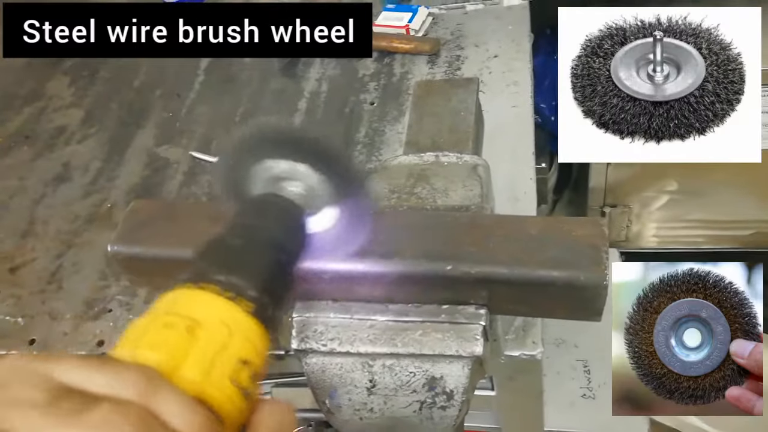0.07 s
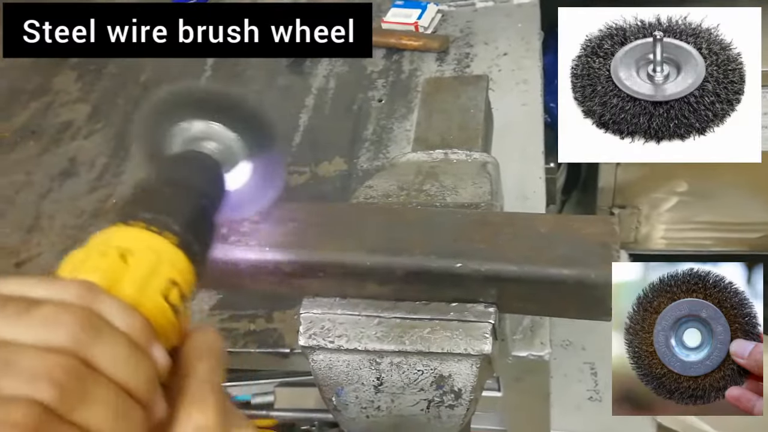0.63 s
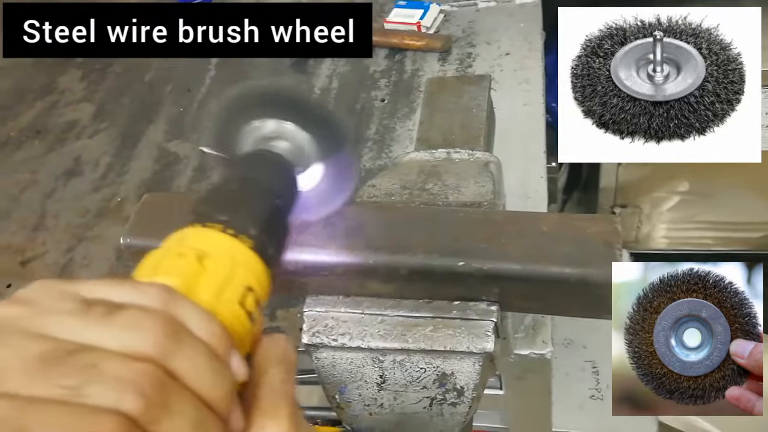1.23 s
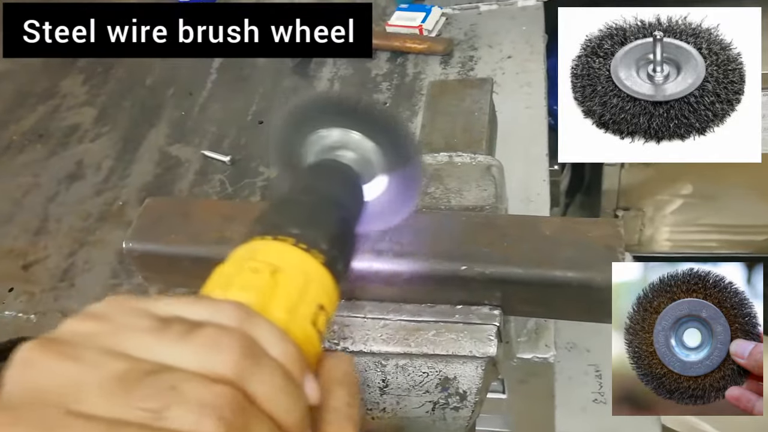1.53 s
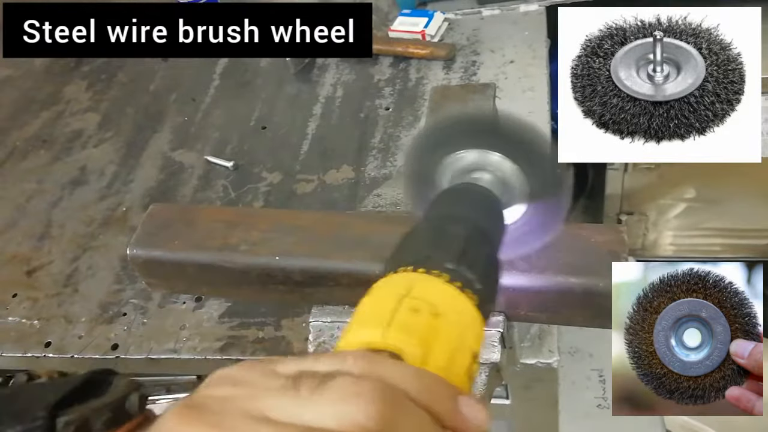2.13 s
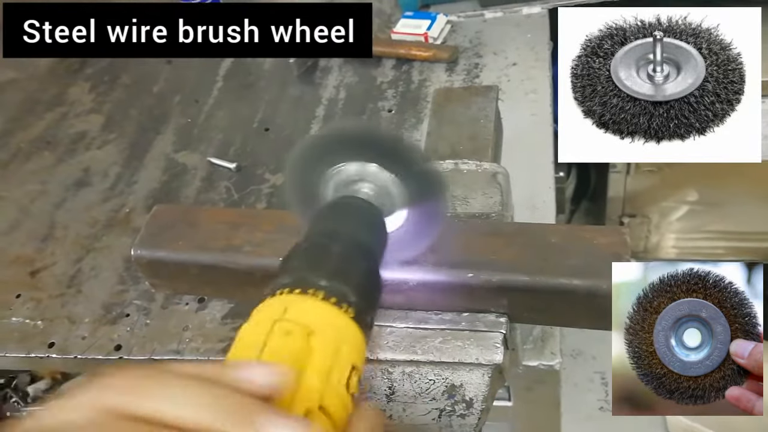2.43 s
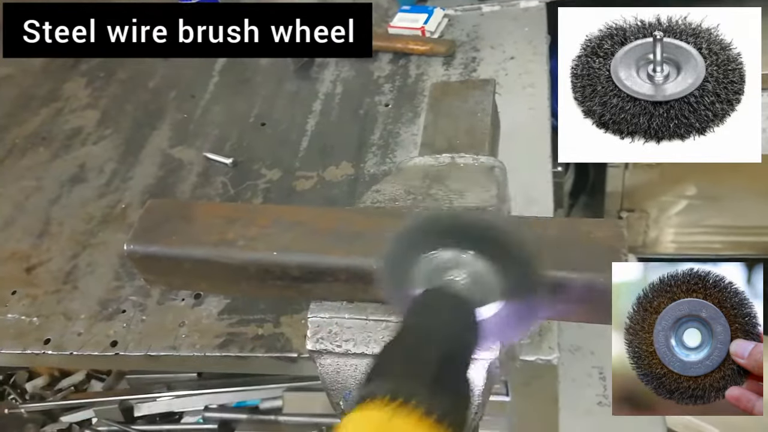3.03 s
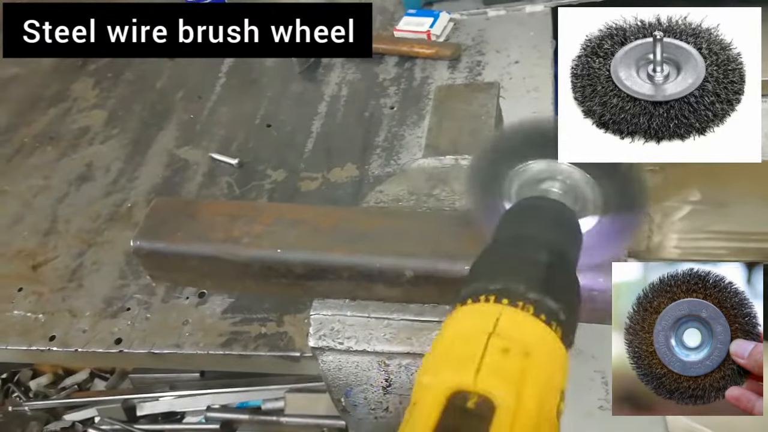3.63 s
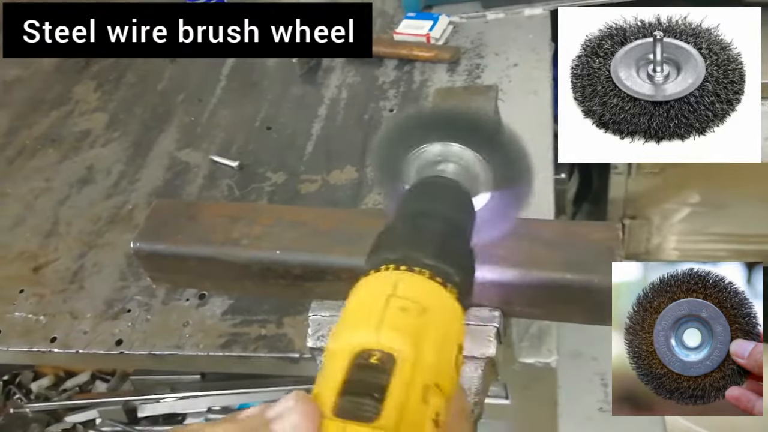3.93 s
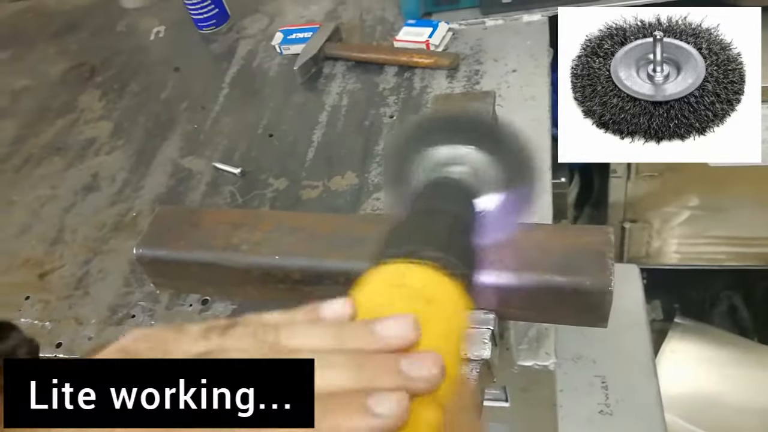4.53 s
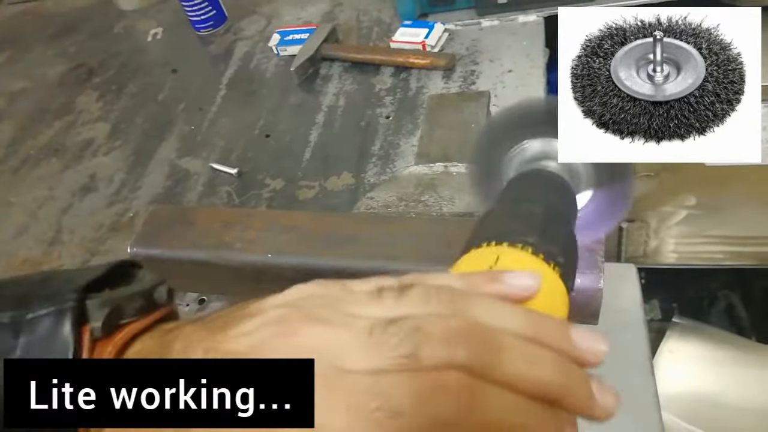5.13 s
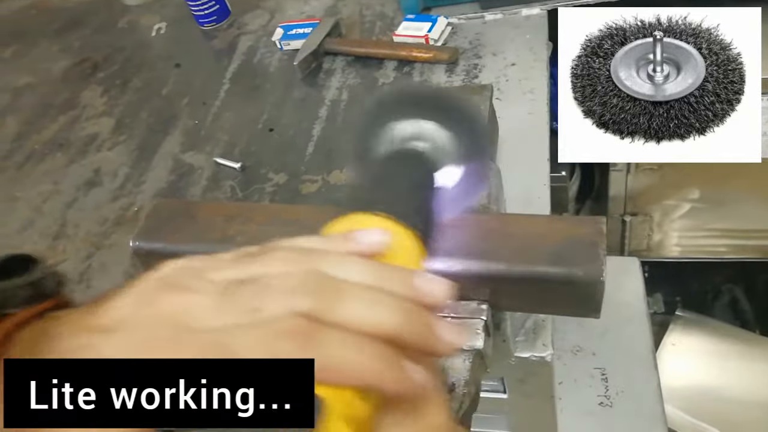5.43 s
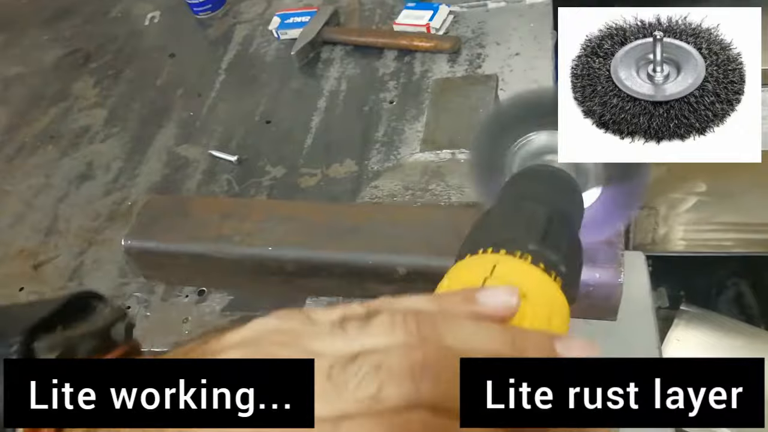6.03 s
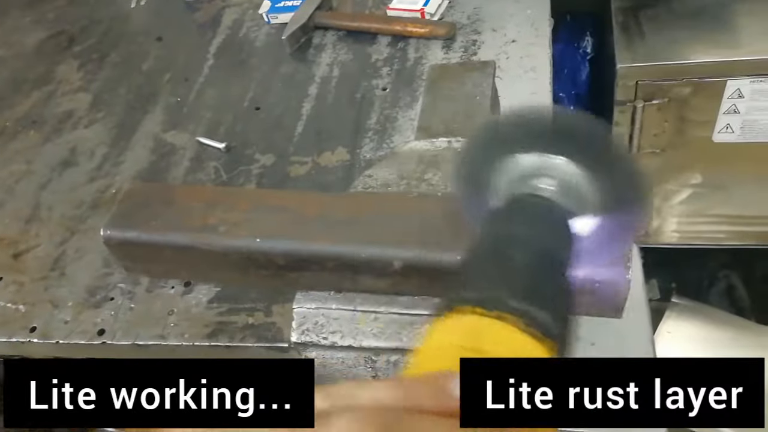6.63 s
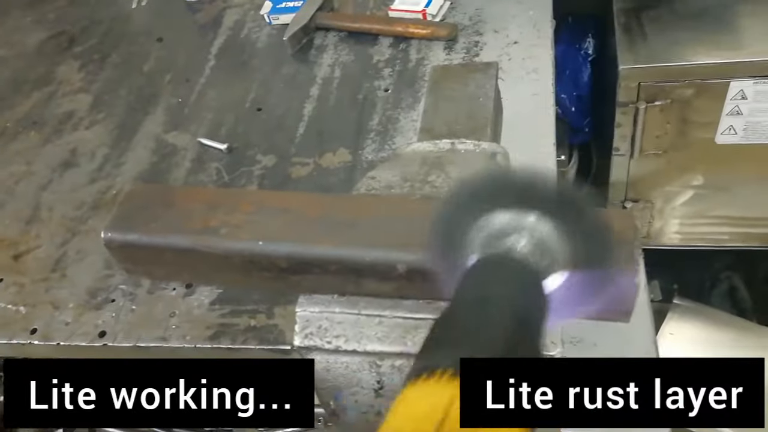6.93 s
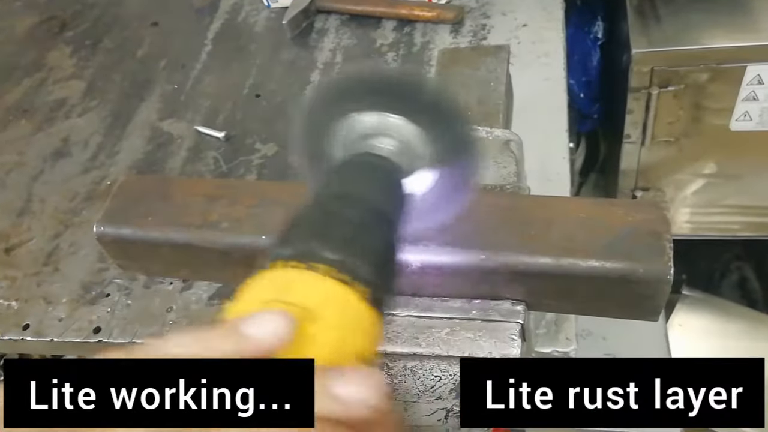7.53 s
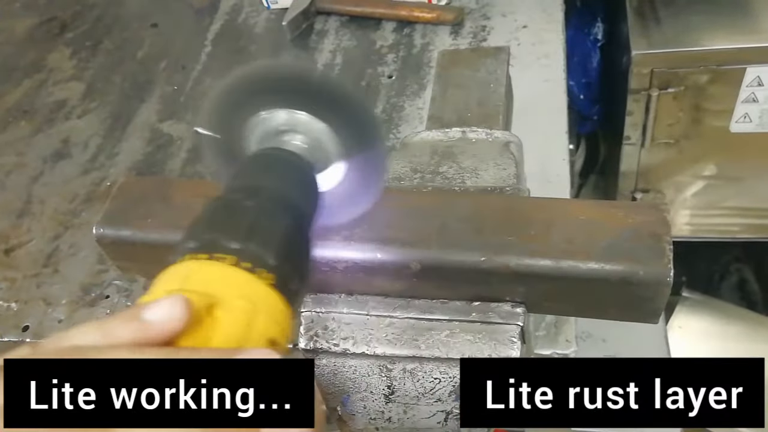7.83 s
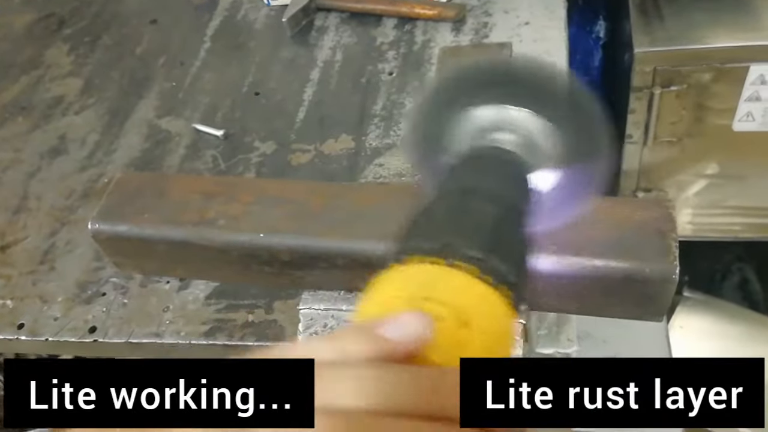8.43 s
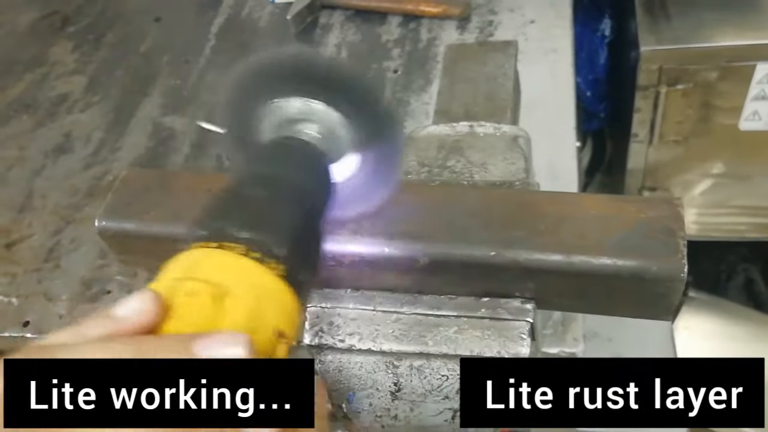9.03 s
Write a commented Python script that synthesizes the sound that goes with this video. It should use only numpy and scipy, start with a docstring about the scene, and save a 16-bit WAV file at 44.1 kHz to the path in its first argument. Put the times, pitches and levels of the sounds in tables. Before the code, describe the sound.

From the first moment, a wire wheel on a cordless drill scrubs a rusty steel bar with a dense, hissing rasp and a light metallic ring. The rasp grows a little stronger by about 2 seconds and keeps shifting in tone as the wheel moves back and forth. At around 2.2 to 2.5 seconds the wires catch the edge in one rough, falling screech. The drill's high whine runs throughout, swelling in short surges, most clearly between 2.5 and 5.3 seconds. Its pitch slowly sinks under the load, with small recoveries near 3 and 7 seconds. A thinner gear whistle comes up slightly around 7.5 to 8 seconds and again near 9. The scrubbing continues to the end, just past 9 seconds. The sound is close and in stereo, with a faint low workshop rumble and hum beneath.

```python
"""In a humming workshop, a cordless drill spins a wire wheel along a rusty steel bar held in a vice.
Thousands of bristle strikes a second make the bar and wheel ring with a rasp, and once the wires
screech over the edge. The motor and gears whine, sag under the load and pick up when the hand eases off.
Two close microphones hear the rasp change as the wheel travels back and forth."""
import sys
import numpy as np
from scipy import signal
from scipy.fft import rfft, irfft
from scipy.io import wavfile
from scipy.ndimage import uniform_filter1d

SR = 44100
rng = np.random.default_rng(int(sys.argv[2]) if len(sys.argv) > 2 else 0)


def waveform_to_disk(signal):
    """Save audio, clipped to [-1, 1], as 16-bit WAV at the path in sys.argv[1]."""
    frames = np.transpose(np.atleast_2d(signal))
    scaled = np.clip(frames, -1, 1) * 32767
    samples = np.round(scaled).astype(np.int16)
    wavfile.write(sys.argv[1], SR, samples)


N = 408807
T = np.arange(N) / SR
SIDES = np.array([[.5], [-.5]])  # splits a balance (left minus right) between the two microphones

# The room's rumble. Each row: frequency in Hz, relative level in dB.
ROOM_RUMBLE = [(12, -31), (20, -5.5), (38, 1), (76, -5), (109, -6.5), (188, -7), (238, -15), (297, -14),
               (450, -26), (580, -49), (990, -120)]
# The room's hum. Each row: pitch in Hz, level in dB.
ROOM_HUM = [(32.3, -56), (99.7, -64), (114, -63), (145, -64)]
# How fast the motor turns. Each row: time in seconds, turns per second.
SHAFT_SPEED = [(0, 335), (0.25, 332.3), (0.68, 327.2), (1.2, 322.3), (1.62, 322.2), (2.27, 313),
               (2.55, 315.6), (3.02, 309), (3.17, 319.2), (3.33, 321.2), (3.39, 317), (3.6, 317),
               (4.1, 309.8), (4.36, 310.4), (4.58, 307), (5.04, 303.3), (5.29, 302.4), (5.5, 294.7),
               (5.8, 295), (6.1, 297), (6.4, 294), (6.98, 292.3), (7.22, 301.6), (7.6, 297.6), (8.1, 293.8),
               (8.85, 284), (9.27, 281.5)]
# The whine swells as the drill moves. Each row: start and end in seconds, peak and balance in dB.
WHINE_SWELLS = [(-.15, 0.27, -48, -6), (.5, 1.02, -41, -7), (1.26, 1.7, -37.5, -13),
                (1.72, 2.08, -37.5, -10), (2.19, 2.397, -37, -9), (2.46, 2.632, -34, 1.5),
                (2.587, 2.767, -32, -8), (2.76, 2.95, -41, -7), (3.018, 3.33, -30.5, -9),
                (3.42, 3.64, -30.5, -1), (3.53, 3.85, -36.5, -14), (4.09, 4.521, -34, -2),
                (4.56, 4.97, -36.5, -3), (5.1, 5.32, -35.5, -1), (6.47, 7.02, -44, -10),
                (7.139, 7.326, -40, -8), (7.55, 8.3, -44, 2), (9.001, 9.399, -48, -3)]
# A thinner gear whistle stands out. Each row: start and end in seconds, peak and balance in dB.
WHISTLE_SWELLS = [(7.3, 8.151, -46, -7), (8.74, 9.14, -43, -7)]
# Other motor and gear tones. Each row: multiple of the shaft speed, base level in dB, balance in dB.
MOTOR_TONES = [(0.995, -65.5, -7), (2.003, -66.5, 0), (2.993, -57.5, -0.5), (5, -55, -16),
               (9.95, -54.5, -9), (13.92, -51.5, -8), (20.1, -61, -3), (30.06, -61.5, 7)]
# Where the drill's housing rings. Each row: frequency in Hz, width in Hz, boost in dB.
HOUSING_RINGS = [(668, 27, 7.5), (987, 47, 10.5), (8925, 390, 11)]
# The falling screech. Each row: time in seconds, pitch in Hz, level in dB.
SCREECH = [(2.15, 3500, -70), (2.25, 3200, -40), (2.34, 2670, -31.5), (2.41, 2374, -34), (2.5, 2210, -46),
           (2.62, 1930, -70)]
# The hand's strokes. Each row: time of the turn in seconds, reach (0 left, 1 right), pause in seconds.
HAND_STROKES = [(2.05, 0.79, .02), (2.8, 0.87, .05), (3.55, 0.96, 0.073), (4.27, 1, .1), (5.2, 0.98, .02),
                (6.05, 0.99, 0.016), (6.95, 0.91, 0.42), (8.33, 0.78, 0.022)]
# How hard the wheel scrubs. Each row: time in seconds, strength in dB.
SCRUB_STRENGTH = [(0.0, -34.5), (0.95, -35.5), (1.4, -32), (2.3, -30), (3.25, -30), (4.0, -31),
                  (5.7, -32.5), (7.6, -31), (9.27, -32.5)]
# The fine, high scratching. Each row: time in seconds, strength in dB.
HISS_STRENGTH = [(0, -54.5), (1.2, -52.5), (2.1, -50.5), (3.6, -50.5), (4.0, -47.5), (4.45, -46.5),
                 (4.8, -50.5), (5.2, -49), (7.4, -51), (7.8, -51), (8.35, -50.5), (9.27, -50)]
# Where the bar and wheel ring. Each row: frequency in Hz, width in Hz, boost in dB.
STEEL_RINGS = [(1282, 123, 2), (1720, 140, 1), (4300, 620, 2)]
# Ringing that swells while the bristles bite at one spot.
# Each row: start and end in seconds, first and last frequency in Hz, width in Hz, boost in dB.
BITE_RINGS = [(-2.5, 1.7, 1000, 910, 240, 7), (-.6, 0.78, 4500, 4280, 450, 3),
              (-.6, 0.6, 2950, 2850, 350, 1.5), (-0.7, 1.6, 5400, 5900, 800, 2),
              (0.8, 2.75, 1150, 1340, 260, 4), (1.0, 2.8, 3060, 3450, 260, 3.5),
              (1.1, 2.1, 4400, 4600, 450, 3), (2.5, 3.8, 1580, 1620, 280, 3),
              (2.5, 4.2, 2300, 2060, 350, 3.5), (3.9, 4.6, 4200, 4280, 385, 3.5),
              (4.5, 5.19, 2950, 2860, 234, 3), (5, 5.05, 2400, 2350, 220, 6.5),
              (4.5, 5.53, 4740, 4950, 800, 5), (4.85, 5.6, 4240, 4200, 360, 4),
              (5.5, 6.6, 4500, 4750, 850, 2.5), (5.5, 6.64, 4230, 4180, 450, 4.5),
              (6.4, 6.4, 5300, 5150, 470, 7), (6.5, 7.38, 4230, 4200, 510, 6),
              (7.05, 8.12, 2510, 2550, 410, 5), (7.15, 8.3, 4130, 4130, 417, 6.5),
              (7.5, 8.28, 1620, 1664, 180, 4), (8, 8.95, 2440, 2570, 380, 7),
              (8.0, 8.8, 4450, 4140, 600, 4.5), (8.5, 9.5, 1700, 1734, 177, 3),
              (8.5, 9.4, 5950, 5800, 930, 3)]
# The rasp's tone colour. Each row: frequency in Hz, the left microphone's gain in dB with the wheel
# at the bar's left end and at its right end, then the same two for the right microphone.
RASP_COLOUR = [(436, -24, -29, -28, -29.5), (732, -16, -26.5, -18.5, -17.5),
               (1001, -11.5, -14.5, -15, -9.5), (1234, -5.5, -6, -1.5, -1), (1740, -15, -12.5, 1.5, -1.5),
               (2020, -12.5, -13.5, -2, -1), (2750, -14.5, -9, -5.5, -1), (3220, -12, -7, -2.5, 1),
               (3870, -11.5, -12, -8.5, -1), (4060, -8, -12.5, -2.0, -4), (5200, -2, -13, -5, -1.5),
               (6220, -3.5, -9.5, -10.5, -6.5), (8300, -11.5, -16, -13.5, -16.5),
               (10730, -23, -26, -23, -26.5), (15000, -25, -27, -25.5, -25.5)]
# How alike the microphones sound. Each row: frequency in Hz, likeness and share of the delay (0 to 1).
MIC_LIKENESS = [(40, 1, 1), (402, 0, 1), (755, 0.53, 0.92), (1180, .9, 0.41), (1670, 0.79, 0.34),
                (2190, 0.47, 0.96), (6060, 0.51, 0.94), (6230, .15, .5), (6370, 0.94, 0.01),
                (9000, 0.57, .03), (14800, 1, 0.02)]


def undb(db):
    """Turn decibels into a gain."""
    return 10 ** (np.asarray(db) / 20)


def over_time(table, t):
    """Read a table's columns at the times t."""
    times, *columns = np.transpose(table)
    return [np.interp(t, times, column) for column in columns]


def over_frequency(table, hz):
    """Read a table's columns at the frequencies hz, on a log scale."""
    points, *columns = np.transpose(table)
    return [np.interp(np.log(hz + 1), np.log(points), column) for column in columns]


def bell(offset, width):
    """A resonance hump: 1 at the centre, one half at half the width away."""
    return .5 ** ((2 * offset / width) ** 2)


def wander(rate):
    """A random drift of about 1 either way, with `rate` new values a second."""
    knots = rng.standard_normal(N // 100)
    return np.interp(T * rate, np.arange(len(knots)), knots)


def ripple(shape, size):
    """A smooth random pattern over frequency and time, about 1 either way."""
    field = rng.standard_normal(shape)
    for axis in (0, 1, 0, 1):
        field = uniform_filter1d(field, size[axis], axis=axis)
    return field / field.std()


def tone(turns, db, balance_db, lead=0):
    """A pure tone at both microphones; the left is ahead by `lead` radians."""
    return np.sqrt(2) * undb(db + SIDES * balance_db) * np.sin(2 * np.pi * turns + SIDES * lead)


def workshop(rumble_db=-52.0, waver_db=2):
    """Low rumble and a wavering hum, the same at both microphones."""
    shape_db, = over_frequency(ROOM_RUMBLE, np.arange(N // 2 + 1) * SR / N)
    rumble = irfft(rfft(rng.standard_normal(N)) * undb(shape_db), N)
    hum = sum(tone(hz * T + 0.12 * wander(3), db + waver_db * wander(5), 0) for hz, db in ROOM_HUM)
    return undb(rumble_db) * rumble / rumble.std() + hum


def swelling(swells, quiet_db, quiet_balance_db, wander_db=4.5, roundness=0.47):
    """Level and balance in dB of a quiet, drifting drill tone with rounded swells on top."""
    power = undb(quiet_db + wander_db * wander(6.5) + SIDES * quiet_balance_db) ** 2
    for start, end, peak_db, balance_db in swells:
        progress = np.clip((T - start) / (end - start), 0, 1)
        arch = (4 * progress * (1 - progress)) ** roundness
        power += (undb(peak_db + SIDES * balance_db) * arch) ** 2
    left_db, right_db = 10 * np.log10(power)
    return (left_db + right_db) / 2, left_db - right_db


def drill(shaft_hz, jitter=0.000883, whine_multiple=15, whistle_multiple=13.06):
    """Motor and gears sing at multiples of one slightly unsteady shaft speed."""
    turns = np.cumsum(shaft_hz * (1 + jitter * wander(60))) / SR
    db, balance_db = swelling(WHINE_SWELLS, quiet_db=-47, quiet_balance_db=-8)
    whine = tone(whine_multiple * turns, db + 1.2 * wander(30), balance_db + 2 * wander(3.03), lead=1)
    db, balance_db = swelling(WHISTLE_SWELLS, quiet_db=-50.5, quiet_balance_db=-5)
    whistle = tone(whistle_multiple * turns, db, balance_db)
    sound = whine + whistle
    for multiple, base_db, balance_db in MOTOR_TONES:
        # these tones grow louder where the housing rings along
        pitch_hz = multiple * shaft_hz
        housing_db = sum(boost * bell(pitch_hz - hz, width) for hz, width, boost in HOUSING_RINGS)
        db = base_db + housing_db + 2.5 * wander(10)
        sound += tone(multiple * turns, db, balance_db, lead=1.53 * wander(1.967))
    return sound


def skid(width_hz=720):
    """Wires chatter over the edge of the bar in a rough, falling screech."""
    hz, db = over_time(SCREECH, T)
    noise = rng.standard_normal(N) + 1j * rng.standard_normal(N)
    chatter = signal.sosfilt(signal.butter(2, width_hz / 2, fs=SR, output="sos"), noise)
    chatter /= chatter.std()
    # the chatter shakes both pitch and loudness
    turns = np.cumsum(hz) / SR + np.angle(chatter) / (2 * np.pi)
    return abs(chatter) * tone(turns, db, balance_db=-6)


def wheel_place(t, bars_per_s=1.24, rest_place=0.2):
    """Where the wheel is (0 left, 1 right): the hand pushes it out, pauses and draws it back."""
    strokes = [reach - bars_per_s * np.maximum(abs(t - turn) - pause / 2, 0)
               for turn, reach, pause in HAND_STROKES]
    return np.clip(np.max(strokes, axis=0), rest_place, 1)


def above_average(values, t, span_s):
    """How far a curve lies above its own running average."""
    return values - uniform_filter1d(values, max(int(span_s / (t[1] - t[0])), 1))


def hiss_change(t, place, shaft_hz, usual_db=-51.0, db_per_bar=7, db_per_hz=0.5):
    """The hiss grows at the far end of a stroke and thins as the hand eases and the motor picks up."""
    db, = over_time(HISS_STRENGTH, t)
    further_out = above_average(place, t, span_s=0.8)
    faster_hz = np.maximum(above_average(np.interp(t, T, shaft_hz), t, span_s=0.85), 0)
    return db - usual_db + db_per_bar * further_out - db_per_hz * faster_hz


def ringing(hz, t):
    """Boost in dB from the ringing bar and wheel: steady peaks, and sliding ones where bristles bite."""
    db = sum(boost * bell(hz - ring_hz, width) for ring_hz, width, boost in STEEL_RINGS)
    for start, end, first_hz, last_hz, width, boost in BITE_RINGS:
        progress = np.clip((t - start) / (end - start), 0, 1)
        ring_hz = first_hz + progress * (last_hz - first_hz)
        db = db + boost * np.sin(np.pi * progress) * bell(hz - ring_hz, width)
    return db


def right_microphone(direct, reflections, hz, place, left_end_s=0.00037, right_end_s=0.00016):
    """The right microphone hears the strikes a little later, mixed with reflections of its own."""
    likeness, delay_share = np.clip(over_frequency(MIC_LIKENESS, hz), 0, 1)
    delay_s = delay_share * (left_end_s + place * (right_end_s - left_end_s))
    delayed = direct * np.exp(-2j * np.pi * hz * delay_s)
    return likeness * delayed + np.sqrt(1 - likeness ** 2) * reflections


def bristles(shaft_hz, gear_ratio=0.054, grit_db=3.0, wobble=0.018, flutter_db=0.5):
    """Wire tips strike thickly and unevenly; the slightly lopsided wheel presses harder once a turn."""
    wheel_turns = np.cumsum(shaft_hz) * gear_ratio / SR
    strikes = rng.standard_normal((2, N)) * undb(grit_db * rng.standard_normal(N))
    pressure = (1 + wobble * np.sin(2 * np.pi * wheel_turns)) * undb(flutter_db * wander(40))
    return strikes / strikes.std() * pressure


def rasp(shaft_hz, gain_db=14.5, patchy_db=2.03, frame=2048):
    """The strikes ring the bar and wheel; the place where they touch sets the tone colour."""
    hz, t, (direct, reflections) = signal.stft(bristles(shaft_hz), SR, nperseg=frame)
    hz = hz[:, None]
    place = wheel_place(t)
    scrub_db, = over_time(SCRUB_STRENGTH, t)
    # The top follows the hiss, the middle the scrubbing. Each row: frequency in Hz, share of each.
    hiss_share, scrub_share = over_frequency(
        [(600, 0.31, 0), (1230, 0.086, 0.23), (4540, 0, 0.79), (7550, 0.25, 0.08), (11000, 0.65, 0.11)],
        hz)
    db = gain_db + scrub_db.mean() + scrub_share * (scrub_db - scrub_db.mean())
    db += hiss_share * hiss_change(t, place, shaft_hz) + ringing(hz, t)
    right = right_microphone(direct, reflections, hz, place)
    colours = over_frequency(RASP_COLOUR, hz)
    channels = []
    for sound, (left_end_db, right_end_db) in ((direct, colours[:2]), (right, colours[2:])):
        colour_db = left_end_db + place * (right_end_db - left_end_db)
        # the steel's many close resonances come and go as the contact moves
        patches_db = patchy_db * ripple(sound.shape, size=(2, 14))
        shaped = sound * undb(db + colour_db + patches_db)
        channels.append(signal.istft(shaped, SR, nperseg=frame)[1][:N])
    return np.array(channels)


def scene():
    """The drill drives the wheel against the bar in the workshop."""
    shaft_hz, = over_time(SHAFT_SPEED, T)
    return rasp(shaft_hz) + skid() + drill(shaft_hz) + workshop()


def record(dry):
    """Cut the treble steeply above 15900 Hz."""
    return signal.sosfilt(signal.ellip(12, .2, 80, 15900, fs=SR, output="sos"), dry)


dry = scene()
out = record(dry)
waveform_to_disk(out)
```